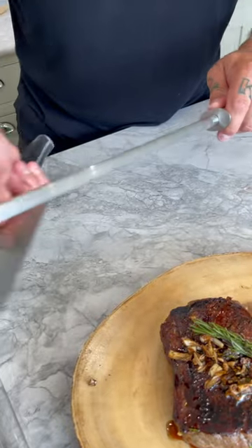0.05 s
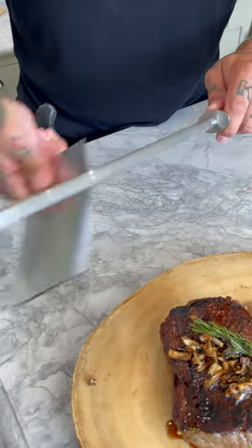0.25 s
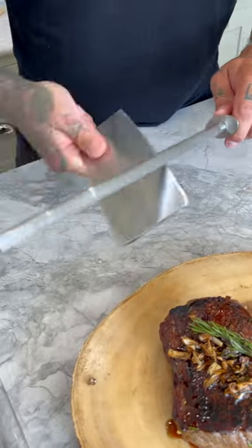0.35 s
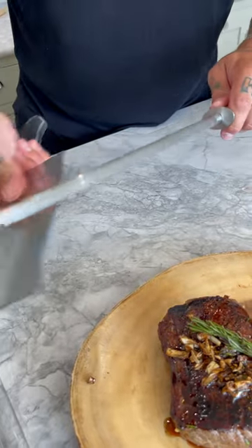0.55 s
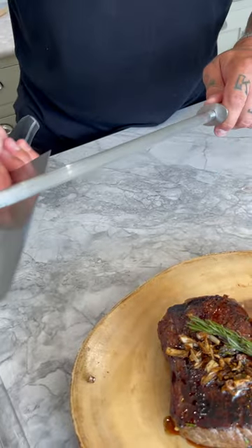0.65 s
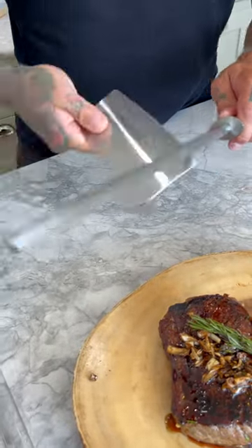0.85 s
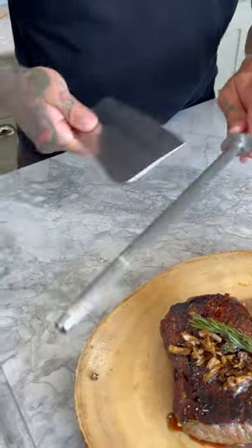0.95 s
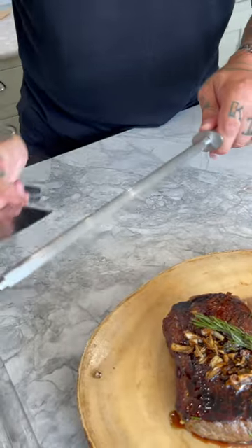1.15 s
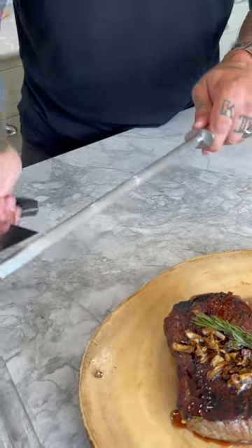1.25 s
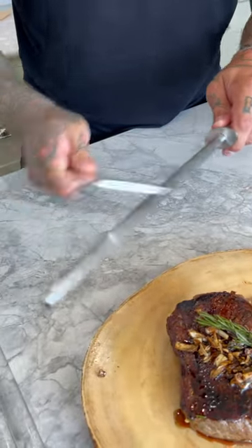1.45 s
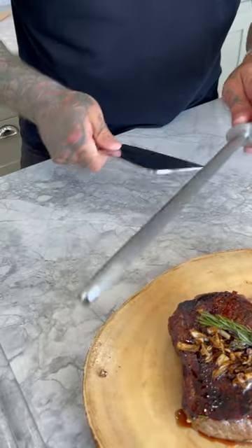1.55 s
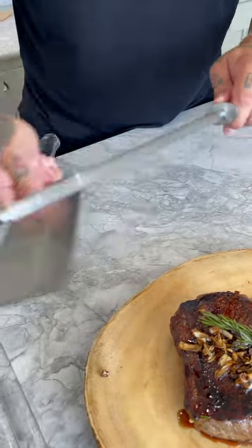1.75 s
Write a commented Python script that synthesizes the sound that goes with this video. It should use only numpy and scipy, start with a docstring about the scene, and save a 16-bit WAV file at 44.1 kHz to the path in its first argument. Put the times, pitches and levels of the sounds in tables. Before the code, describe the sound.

A broad steel blade scrapes along a honing rod in three quick strokes, pauses, then makes a fourth and rings briefly. Light clinks and tiny squeals mark the contact, heard close up in a quiet, slightly echoing kitchen.

```python
"""A broad steel blade is drawn four times along a honing rod in a quiet kitchen.
Rubbing makes the steel ring, and now and then it sticks and slips in a short squeal.
Twice the blade lands with a clink. Lifted off the rod, it sings on one note.
It is heard close up, in stereo, with echoes from hard walls and a low room murmur."""
import sys
import numpy as np
from scipy import signal
from scipy.fft import rfft, irfft
from scipy.io import wavfile

SR = 44100
rng = np.random.default_rng(int(sys.argv[2]) if len(sys.argv) > 2 else 0)


def digitize_waveform(pressure):
    """Quantize a signal to 16-bit integers and store it at the path in sys.argv[1].

    Rows of a 2-D input are taken as channels; values are limited to [-1, 1].
    """
    field = np.atleast_2d(pressure).T
    bounded = np.clip(field, -1, 1)
    quanta = np.round(bounded * 32767).astype(np.int16)
    wavfile.write(sys.argv[1], SR, quanta)


N = 79380
T, HZ = np.arange(N) / SR, np.fft.rfftfreq(2 * N, 1 / SR)

# Tone of the room's murmur: pitch_hz, level_db
MURMUR_TONE = [(20, -27), (45, -11), (68, -8.5), (84, 8), (102, -6.5), (124, 4), (200, -4.5), (500, -9.5),
               (1200, -22.5), (4000, -37), (16000, -57.5)]
# How alike the murmur is left and right (1 = the same): pitch_hz, likeness
MURMUR_LIKENESS = [(200, 1), (700, 0.88), (3000, 0.13)]
# Tone of the echo that is dying away at the start: pitch_hz, level_db
DYING_ECHO_TONE = [(1000, -28), (3000, -3), (7000, -0.5), (11000, -3.5), (13000, -40.5)]
# The free blade's note swells and fades as it turns in the air, one list per note: time_s, level_db
SINGING_LEVELS = [
    [(0, -54.5), (.04, -65), (.117, -74)],
    [(1.485, -72), (1.505, -35.5), (1.535, -57), (1.57, -40.5), (1.61, -42.5), (1.64, -50), (1.675, -47),
     (1.712, -65), (1.738, -45), (1.77, -48.5), (1.8, -54)],
]
# The blade lands on the rod: start_s, ring_db, fade_s (time to drop 60 dB), crack_db
LANDINGS = [(0.1191, -29.5, 0.045, -32.5), (1.281, -34.5, 0.1, -32)]
# Notes that a landing rings: pitch_hz, first_landing_db, second_landing_db
CLINK_NOTES = [(553, -20.5, -17), (1133, -14, -10.5), (1545, -18, -5.5), (2470, -3, -11), (3756, -6.5, -3),
               (4350, -6.5, -8), (5084, -7.5, -5), (6440, -3, 0), (7840, -0.5, -9), (10080, -7, 4),
               (10880, -11.5, 6)]
# Tone of a landing's crack: pitch_hz, level_db
CRACK_TONE = [(100, -14), (450, -4.5), (4000, 1), (11000, -3.5), (15000, -30.5)]
# Notes that ring on faintly in the steel: pitch_hz, level_db
LONG_RING_NOTES = [(544, -27), (2998, -26.5), (3310, -31), (6335, -30.5)]
# How hard the blade rubs, one list per stroke: time_s, friction_db
STROKE_FRICTION = [
    [(.125, -18), (.15, -13), (.2, -6.5), (.245, -2), (.29, 0.5), (.345, -2.5), (.37, -9.5), (.39, -19)],
    [(.395, -18), (.422, -1.5), (.455, -3), (.495, -1.5), (.52, -4), (.575, -8), (.635, -19.5)],
    [(.645, -14), (.675, -5.5), (.715, -2), (.742, -1), (.755, -1), (.795, -0.5), (.835, -3), (.888, -7.5),
     (.91, -23.5)],
    [(1.285, -8.5), (1.315, -6.5), (1.355, -2.5), (1.43, -2), (1.465, -3.5), (1.486, -1), (1.508, -1.5),
     (1.53, -5)],
]
# How strongly each pitch range follows the rubbing: pitch_hz, db_per_friction_db
FRICTION_RESPONSE = [(600, 0.6), (2500, 1), (5000, 1.84), (10000, 2.5)]
# Overall tone of the rubbed steel: pitch_hz, level_db
STEEL_TONE = [(40, -37), (85, -28.5), (200, -47.5), (600, -31), (1300, -29), (2300, -21), (4500, -14),
              (6050, -15.5), (6600, -2), (8700, -5.5), (11000, -2.5), (11900, -4), (13100, -9.5),
              (13700, -19.5), (15700, -26.5)]
# Where blade and rod ring when touching: pitch_hz, width_hz, boost_db
STEEL_PEAKS = [(798, 45, 7.5), (1141, 66, 5), (1660, 130, 8.5), (2126, 90, 4), (2450, 32, 9),
               (2684, 117, 8.5), (3043, 42, 11), (3860, 130, 9), (5257, 183, 14), (6403, 84, 11),
               (8153, 170, 11), (9440, 410, 6), (9820, 130, 4.5), (10890, 240, 9.5)]
# Quiet gaps between those peaks, given for the free blade: pitch_hz, width_hz
STEEL_GAPS = [(1870, 34), (2820, 76), (3290, 83)]
# The blade's note, raised by pressing on the rod: time_s, pitch_hz, level_db
PRESSED_NOTE = [(0.229, 3040, -50), (0.359, 3050, -50), (.395, 3110, -57.5), (0.447, 3107, -39),
                (.54, 3084, -59.5), (.587, 3053, -36), (.635, 3040, -60.5), (.705, 3033, -38.5),
                (.8, 3120, -48.5), (0.866, 3380, -39.5), (.91, 3325, -60)]
# Moments when sticking and slipping locks onto one pitch: peak_s, pitch_hz, level_db, build_s
SQUEAL_EVENTS = [(0.245, 6440, -23.5, 0.0065), (0.279, 11200, -13.5, 0.01), (0.286, 11070, -12, 0.0021),
                 (.29, 1660, -49.5, 0.057), (0.3, 10870, -14, 0.0052), (.312, 9730, -18.5, 0.0084),
                 (0.423, 7270, -23, 0.0061), (0.451, 7436, -21.5, 0.024), (0.4511, 10160, -5, 0.0044),
                 (0.467, 10170, -16.5, .02), (0.491, 11040, -18.5, 0.0071), (0.546, 5225, -33.5, 0.029),
                 (0.554, 11210, -20, .01), (.56, 2450, -51, 0.031), (0.567, 11160, -20, 0.0064),
                 (.592, 1660, -48.5, 0.03), (0.682, 1650, -46.5, 0.029), (.731, 11080, -19, .006),
                 (0.744, 5150, -18.5, .012), (0.747, 11250, -9, 0.0032), (0.754, 1694, -43.5, 0.026),
                 (.761, 8300, -27.5, 0.0057), (0.778, 6900, -25, 0.0063), (.78, 2424, -38, 0.035),
                 (.794, 11340, -18, .006), (0.816, 11120, -12.5, 0.0071), (.836, 823.5, -48.5, .014),
                 (0.835, 10080, -17, 0.0062), (.884, 7160, -27, 0.0057), (1.381, 6436, -21, 0.0029),
                 (1.409, 6440, -26, 0.0067), (1.39, 3943, -35.5, 0.028), (1.447, 7290, -24.5, 0.016),
                 (1.486, 9700, -25, 0.0066), (1.508, 10140, -22, 0.0064)]
# High squeals beam at the listener, so less of them reaches the room: pitch_hz, gain_db
SQUEAL_TO_ROOM = [(1000, -2), (4000, -6), (10000, -9.5)]
# Time the room's echo takes to drop 60 dB: pitch_hz, fade_s
ECHO_FADE = [(300, 0.53), (1500, 0.76), (3500, 0.79), (7000, 0.61), (10000, 0.54), (14000, 0.3)]
# How alike the echo is left and right: pitch_hz, likeness
ECHO_LIKENESS = [(500, 0.21), (2200, 0.99)]
# How far the left wave runs ahead of the right (negative = behind): pitch_hz, lead_radians
LEFT_LEAD = [(0, -3), (2400, 0.73), (4300, 1.59), (4750, -6), (5100, 4.5), (6200, 6.5), (9100, 9.5),
             (11300, 11.5), (15500, 14.5)]

NOTE_HZ = 2983  # the free blade's own note
WOBBLE_HZ, WOBBLE_S = 43.8, 0.0032  # typical pitch waver of a 10 kHz squeal, and its time scale


def amp(db):
    """Turns decibels into a number to multiply by."""
    return 10 ** (np.asarray(db) / 20)


def unit(x):
    """Scales a signal to an average (rms) size of 1."""
    return x / np.sqrt(np.mean(x ** 2) + 1e-20)


def read(points, hz):
    """Looks up a table at any pitch, blending between rows on a musical (log) scale."""
    pitches, values = np.transpose(points)
    return np.interp(np.log(hz + 1), np.log(pitches + 1), values)


def level_curve(points):
    """Joins points into a level in dB over time, silent before and after them."""
    times, db = np.transpose(points)
    return np.interp(T, times, db, left=-200, right=-200)


def shape(x, gain):
    """Filters a sound with one gain for each frequency."""
    return irfft(rfft(x, 2 * N) * gain)[..., :N]


def ring_after(gain):
    """Makes a filter ring only after it is hit, like a real object (minimum phase)."""
    cepstrum = irfft(np.log(np.maximum(gain, 1e-5)))
    cepstrum[1:N] *= 2
    cepstrum[N + 1:] = 0
    return np.exp(rfft(cepstrum))


def wander(seconds):
    """A smooth random drift that changes on the given time scale."""
    return unit(shape(rng.standard_normal(N), np.exp(-(HZ * seconds * 2) ** 2)))


def stereo_pair(a, b, likeness):
    """Mixes two unrelated sounds into a partly alike left and right."""
    same = np.clip(read(likeness, HZ), -1, 1)
    mid, side = shape(a, np.sqrt((1 + same) / 2)), shape(b, np.sqrt((1 - same) / 2))
    return np.array([mid + side, mid - side])


def room_murmur(level_db=-61.5):
    """The low, steady murmur of the room."""
    air = stereo_pair(*rng.standard_normal((2, N)), MURMUR_LIKENESS)
    return amp(level_db) * unit(shape(air, amp(read(MURMUR_TONE, HZ))))


def dying_echo(start_db=-54, fall_db_per_s=87.5):
    """The echo of an earlier stroke dies away as the scene opens."""
    noise = unit(shape(rng.standard_normal(N), amp(read(DYING_ECHO_TONE, HZ))))
    return amp(start_db - fall_db_per_s * T) * noise


def singing_blade(lift_s=1.525, slide_hz_per_s=10000):
    """The free blade rings on one note; the last note slides down until the edge leaves the rod."""
    last_note_s = SINGING_LEVELS[1][0][0]
    hz = NOTE_HZ + slide_hz_per_s * np.maximum(lift_s - T, 0) * (T > last_note_s)
    loudness = sum(amp(level_curve(note)) for note in SINGING_LEVELS)
    return np.sqrt(2) * loudness * np.sin(2 * np.pi * np.cumsum(hz) / SR)


def clink(index, start_s, ring_db, fade_s, crack_db, rise_s=0.0003, crack_s=0.0059):
    """Steel lands on steel: a short crack, and a ring that the hand soon damps."""
    age = np.maximum(T - start_s, 0)
    ring = sum(amp(levels[index]) * np.sin(2 * np.pi * (hz * age + rng.random()))
               for hz, *levels in CLINK_NOTES)
    crack = unit(shape(rng.standard_normal(N), amp(read(CRACK_TONE, HZ)))) * np.exp(-age / crack_s)
    rise = 1 - np.exp(-age / rise_s)
    return rise * (amp(ring_db - 60 * age / fade_s) * ring + amp(crack_db) * crack)


def long_ring(x, fade_s=0.54):
    """A few slow-fading notes of the steel store a little of every clink and stroke."""
    notes = sum(amp(db) * np.sin(2 * np.pi * hz * T) for hz, db in LONG_RING_NOTES)
    fade = amp(-60 * T / fade_s)
    return signal.fftconvolve(x, notes * fade / np.linalg.norm(fade))[:N]


def grit(grains_per_s=4000, spread_db=1.5, hiss=0.48):
    """The slipping edge makes thousands of tiny clicks over a hiss."""
    sizes = rng.standard_normal(N) * amp(spread_db * np.minimum(rng.exponential(1, N), 4))
    grains = sizes * (rng.random(N) < grains_per_s / SR)
    return unit(unit(grains) + hiss * rng.standard_normal(N))


def chirps(per_s=900, half_length_s=0.0075, low_hz=2014, high_hz=14990, max_glide_hz_per_s=6000):
    """The slipping edge also makes a swarm of brief gliding tones at random pitches."""
    swarm, age = np.zeros(N + 4096), np.arange(-2048, 2048) / SR
    swell = np.exp(-(age / half_length_s) ** 2)
    for when, pitch, softness, glide, phase in rng.random((int(per_s * N / SR), 5)):
        hz = low_hz + pitch * (high_hz - low_hz)
        turns = hz * age + (glide - .5) * max_glide_hz_per_s * age ** 2 + phase
        at = int(when * N)
        swarm[at:at + len(age)] += amp(.5 - softness) * swell * np.sin(2 * np.pi * turns)
    return unit(swarm[len(age) // 2:][:N])


def blade_pitch():
    """The blade's note in Hz over time: touching the rod stiffens it and raises the pitch."""
    times, hz, _ = np.transpose(PRESSED_NOTE)
    return np.interp(T, times, hz, left=NOTE_HZ, right=NOTE_HZ)


def cut_gaps(x, depth_db=-11):
    """Cuts quiet gaps between the steel's peaks; they move up and down with the blade's note."""
    hz, times, spectrum = signal.stft(x, SR, nperseg=1024, noverlap=896)
    free_hz = hz[:, None] * NOTE_HZ / np.interp(times, T, blade_pitch())
    gaps = sum(np.exp(-((free_hz - centre) / width) ** 2) for centre, width in STEEL_GAPS)
    return signal.istft(spectrum * amp(depth_db * gaps), SR, nperseg=1024, noverlap=896)[1][:N]


def scrape(gain_db=-19.5, chirp_share=0.55):
    """Grit and chirps set the steel ringing; harder rubbing sounds louder and brighter."""
    slips = cut_gaps(np.sqrt(1 - chirp_share) * grit() + np.sqrt(chirp_share) * chirps())
    friction_db = np.max([level_curve(stroke) for stroke in STROKE_FRICTION], axis=0)
    rubbing = np.zeros(N)
    for centre, response in FRICTION_RESPONSE:
        band = read([(hz, hz == centre) for hz, _ in FRICTION_RESPONSE], HZ)
        rubbing += shape(slips, band) * amp(friction_db * response)
    peaks = 1 + sum((amp(db) ** 2 - 1) / (1 + ((HZ - hz) / width) ** 2) ** 2
                    for hz, width, db in STEEL_PEAKS)
    steel_tone = unit(amp(read(STEEL_TONE, HZ)) * np.sqrt(abs(peaks)))
    return amp(gain_db) * shape(rubbing, ring_after(steel_tone))


def pressed_blade(wobble):
    """The blade's thin, wavering ring while it rides on the rod."""
    turns = np.cumsum(blade_pitch() + WOBBLE_HZ / 2 * wobble) / SR
    loudness = amp(level_curve([(time_s, db) for time_s, _, db in PRESSED_NOTE]))
    return loudness * np.sqrt(2) * np.sin(2 * np.pi * turns)


def squeal(peak_s, hz, db, build_s, wobble, flutter, let_go_cycles=23, roughness=0.1):
    """A rough tone grows while the edge sticks and slips in step with the steel, then collapses."""
    from_peak = np.maximum((peak_s - T) / build_s, (T - peak_s) * hz / let_go_cycles)
    swell = np.exp(-np.minimum(from_peak ** 1.5, 20))
    turns = np.cumsum(hz + WOBBLE_HZ * np.sqrt(hz / 10000) * wobble) / SR
    return amp(db) * np.sqrt(2) * swell * (1 + roughness * flutter) * np.sin(2 * np.pi * turns)


def kitchen_echo(x, early_db=-16.5, early_s=0.02, bounces_per_s=900, tail_db=-9.5):
    """Sound bounces off the counter first, then blurs into a fading tail."""
    hz, times, spectrum = signal.stft(rng.standard_normal((2, N)), SR, nperseg=256)
    fade = amp(-60 * times / read(ECHO_FADE, hz)[:, None])
    tail = signal.istft(spectrum * fade, SR, nperseg=256)[1][:, :N] * np.minimum(T / .012, 1)
    bounces = rng.standard_normal((2, N)) * (rng.random((2, N)) < bounces_per_s / SR)
    early = bounces * np.exp(-T / early_s) * (T > .002)
    echo = (amp(tail_db) * unit(tail) + amp(early_db) * unit(early)) / np.sqrt(N)
    return signal.fftconvolve(x[None], stereo_pair(*echo, ECHO_LIKENESS), axes=1)[:, :N]


def scene():
    """Mixes steel, echoes and murmur; the right side of the steel and its echoes is shifted slightly out of
    step with the left."""
    steel = scrape() + sum(clink(index, *row) for index, row in enumerate(LANDINGS))
    steel = steel + long_ring(steel)
    wobble, flutter = wander(WOBBLE_S), wander(WOBBLE_S)  # one unsteady contact shakes every squeal
    squeals = sum(squeal(*row, wobble, flutter) for row in SQUEAL_EVENTS) + pressed_blade(wobble)
    note = singing_blade()
    into_room = steel + shape(squeals, amp(read(SQUEAL_TO_ROOM, HZ))) + amp(1) * note
    echoes = kitchen_echo(into_room) + dying_echo()
    placed_note = note * amp([[3.75], [-3.75]])  # 7.5 dB louder on the left
    left, right = steel + squeals + echoes + placed_note
    right = shape(right, np.exp(-1j * read(LEFT_LEAD, HZ)))
    return np.array([left, right]) + room_murmur()


def record(dry):
    """Cuts the very highest treble, above 15850 Hz."""
    low_pass = signal.firwin(511, 15850, window=("kaiser", 9), fs=SR)
    return signal.oaconvolve(dry, low_pass[None], "same")


dry = scene()
out = record(dry)
digitize_waveform(out)
```